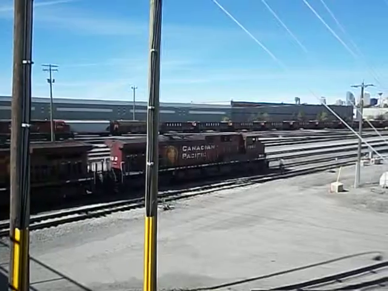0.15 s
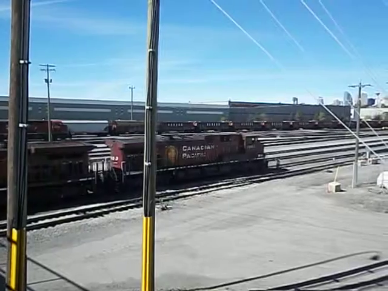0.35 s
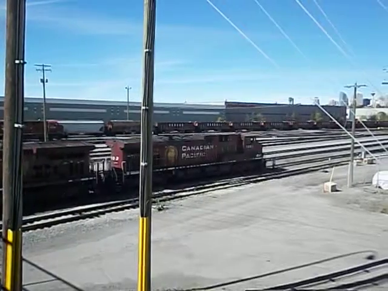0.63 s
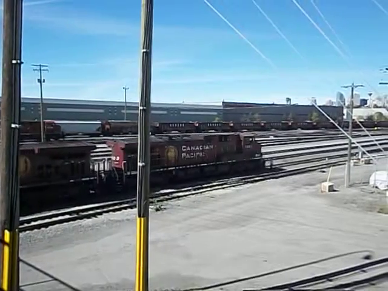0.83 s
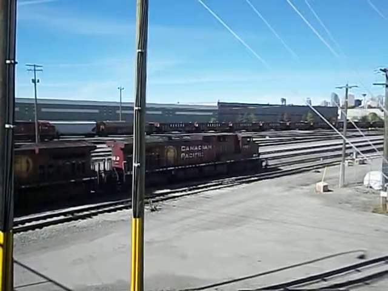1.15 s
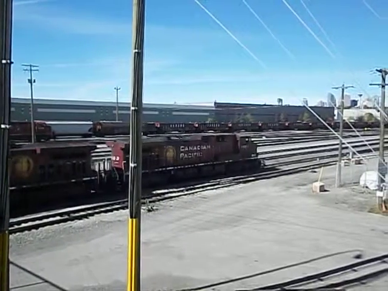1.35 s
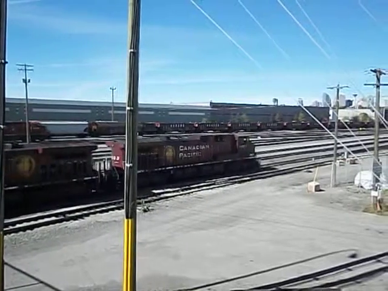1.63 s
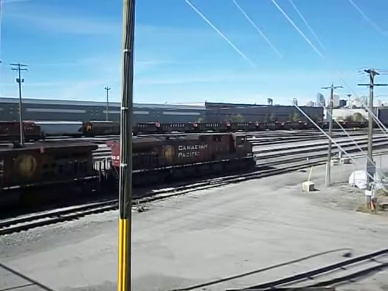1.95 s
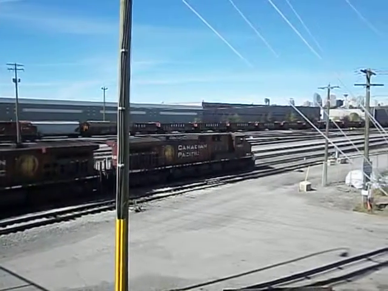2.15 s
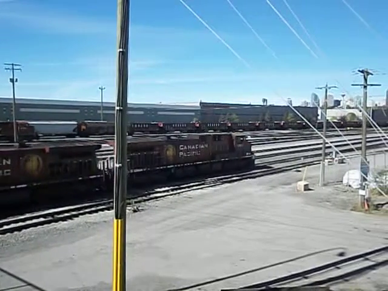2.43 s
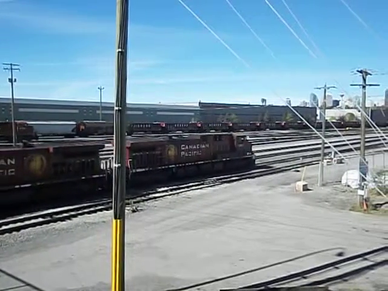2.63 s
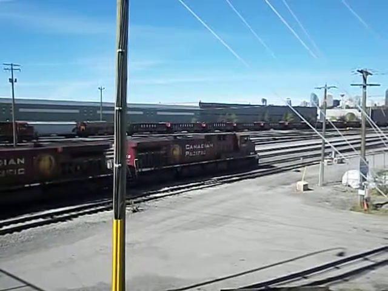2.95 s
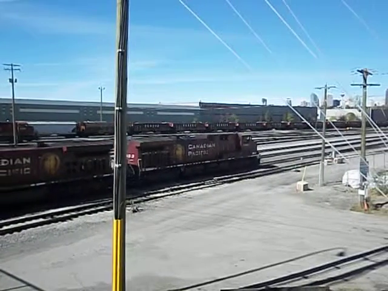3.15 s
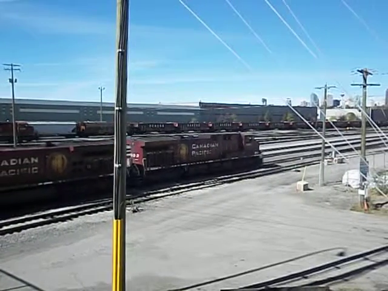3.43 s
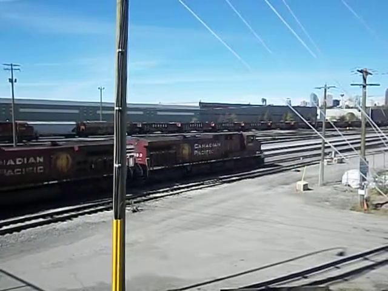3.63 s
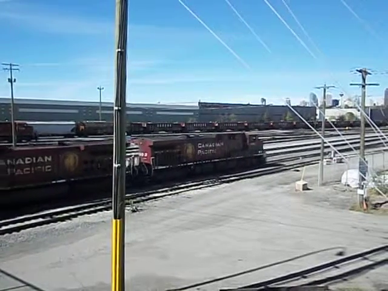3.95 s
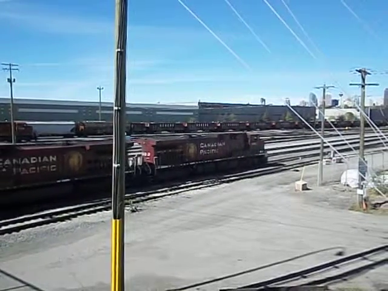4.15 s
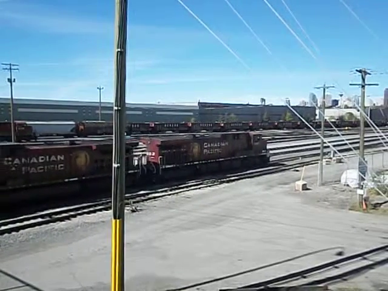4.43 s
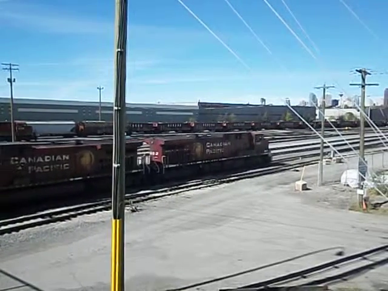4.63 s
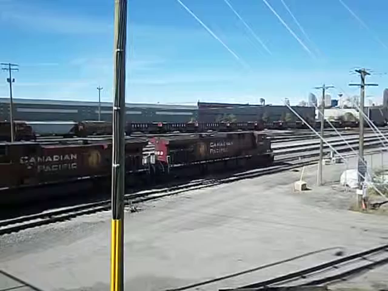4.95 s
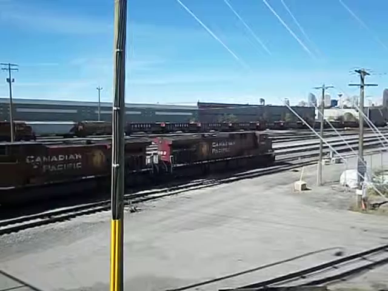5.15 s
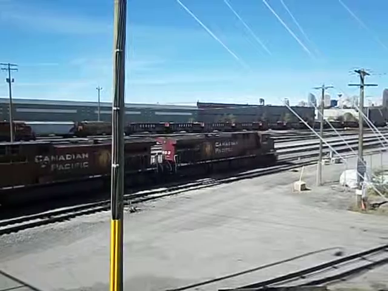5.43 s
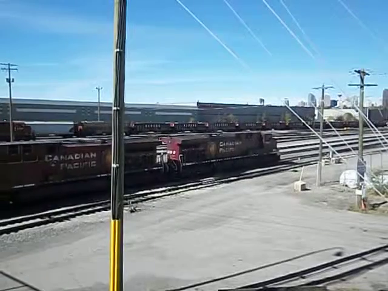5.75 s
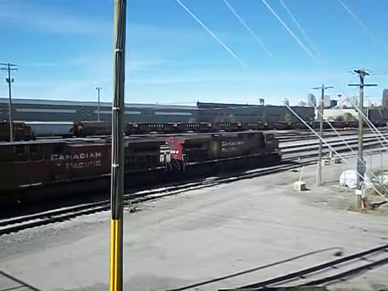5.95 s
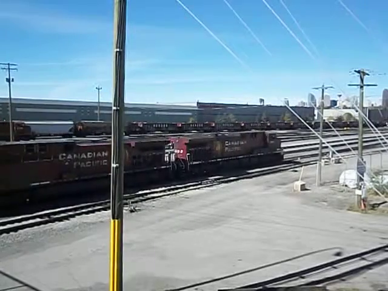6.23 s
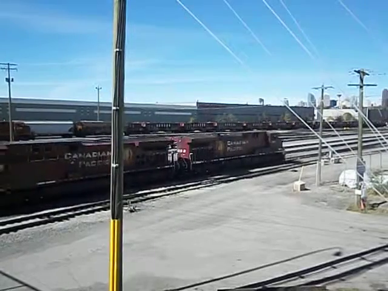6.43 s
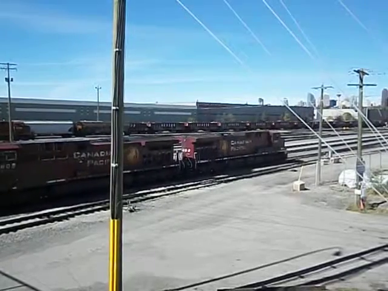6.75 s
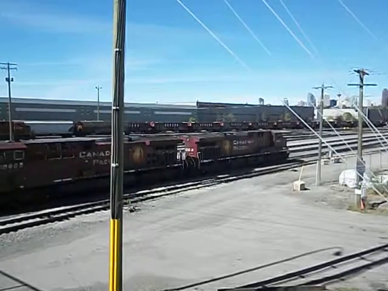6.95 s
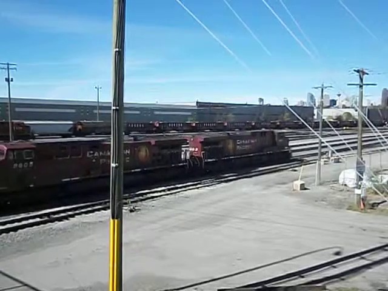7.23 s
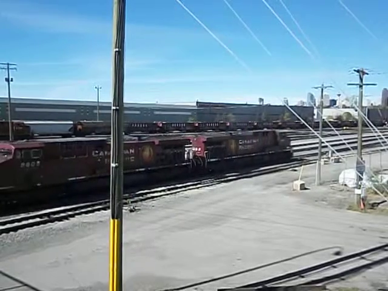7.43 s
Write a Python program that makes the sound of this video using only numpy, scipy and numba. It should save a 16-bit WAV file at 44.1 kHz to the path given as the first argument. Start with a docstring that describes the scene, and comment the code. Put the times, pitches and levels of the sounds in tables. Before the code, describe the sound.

From 0 s, two diesel locomotives run in an open rail yard with a thick, low, uneven throb around 60 Hz, exhaust rumble and broad fan roar. Fuzzy hums of rotating parts and a faint, unsteady blower whine near 530 Hz sit inside it. Irregular bass thumps, several each second, make the whole sound drop abruptly and creep back, as if a small recorder were overloading; peaks are softly clipped and the top treble is missing. At about 3.2 s an air valve spits; from 3.5 s it opens into a strong jet hiss with a breathy, hollow pipe tone, loudest around 3.6-3.8 s, fading out by 4.3 s. The drone carries on, the firing tone swelling near 5 s. Tiny air puffs come at 6.1 and 6.9 s. From about 6 s one engine speeds up, its pitch rising slightly, with heavy chugs about four per second until the end at about 7.6 s.

```python
"""Two diesel locomotives idle in a rail yard with a deep, uneven beat, and one speeds up near the end.
Sines at multiples of the engine cycle make the beat; shaped noise makes rumble, fan roar and hums.
From about 3.2 s an air valve spits and blows off in jet hiss, with a breathy pipe note in the blow-off.
The whole sound keeps dropping suddenly under tall bass thumps and creeping back;
a small recorder ducks the tallest peaks in steps, clips them softly and cuts the top treble."""
import sys
import numpy as np
from scipy import signal
from scipy.fft import rfft, irfft, next_fast_len
from scipy.io import wavfile
from scipy.ndimage import uniform_filter1d, map_coordinates
from numba import njit

SR = 44100
rng = np.random.default_rng(int(sys.argv[2]) if len(sys.argv) > 2 else 0)


def file_out(sig):
    """Save sig as 16-bit WAV at sys.argv[1]."""
    # one column per channel
    cols = np.atleast_2d(sig).T
    # limit, then scale
    lim = np.clip(cols, -1, 1)
    pcm = np.round(lim * 32767).astype(np.int16)
    wavfile.write(sys.argv[1], SR, pcm)


N = 335160
TIME = np.arange(N) / SR  # seconds

# Levels of single sources are those before the shared level curves, wavers and drops.
# Idling engine speed. Each row: time in seconds, four-stroke cycles per second.
ENGINE_CYCLE = [(0, 3.65), (2.5, 3.645), (4, 3.63), (5.5, 3.68), (7.6, 3.7)]
# Unequal cylinders sound multiples of the cycle. Each row: multiple, level in dB rms.
CYLINDER_ORDERS = [(6, -35.5), (7, -33.5), (8, -34.5), (9, -27), (11, -25.5), (12, -30), (13, -24.5),
                   (14, -25), (15, -29), (17, -25.5), (18, -27), (19, -30), (20, -21), (21, -36.5),
                   (22, -31), (24, -44), (25, -35), (28, -30), (29, -30), (36, -30.5)]
# Slow balance of the idle. Each row: time in seconds, orders gain in dB, rumble gain in dB.
IDLE_BALANCE = [(0, -0.5, 0), (1, -0.5, 0), (2, -2.5, 2.5), (3, 2.5, -3.5), (3.5, 2.5, -7), (4, -4.5, 1.5),
                (4.6, -3, 2), (5.5, -2.5, -4.5), (6.5, 0, 0), (7.6, -1, -4)]
# Firing tone, weak while the two engines cancel. Each row: time in seconds, level in dB rms.
FIRING_LEVEL = [(0, -26.5), (.5, -22), (2, -17), (2.4, -27), (4.4, -24.5), (4.9, -14.5), (5.8, -14.5),
                (6.4, -16), (7, -12), (7.6, -13)]
# Firing pitch as one engine speeds up. Each row: time in seconds, pitch in Hz.
FIRING_PITCH = [(0, 58.5), (2, 58.4), (4.4, 58.2), (5.8, 58.9), (6.4, 60.5), (7, 62.5), (7.6, 65)]
# Pulses of one strong cylinder. Each row: centre in seconds, level in dB rms at the centre.
CYLINDER_CHUGS = [(6.269, -23), (6.53, -21), (6.788, -13.5), (7.05, -17), (7.326, -9), (7.58, -11)]
# Second harmonic of the idling engine's firing. Each row: time in seconds, level in dB rms.
OCTAVE_LEVEL = [(0, -30), (1.2, -21.5), (3.5, -25), (4.3, -19.5), (4.9, -22), (5.3, -43.5), (7.6, -42)]
OCTAVE_ORDER = 32  # multiple of the cycle
# Exhaust rumble colour. Each row: frequency in Hz, relative level in dB per Hz.
RUMBLE_COLOUR = [(8.8, -43), (15, -1), (43, 1), (65, -0.5), (220, -16.5), (290, -49), (480, -120)]

# Fan and engine-body colour. Each row: frequency in Hz, relative level in dB per Hz.
ROAR_COLOUR = [(88, -31), (150, 3.5), (205, -6), (254, -3), (309, -7), (341, -4), (514, -2.5), (567, -8),
               (1040, -10.5), (1170, -16), (1620, -20), (1980, -14.5), (2450, -28), (6140, -36),
               (7600, -39.5), (9880, -54.5), (16700, -120)]
# Hood and louvre resonances. Each row: centre in Hz, width in Hz, strength in dB.
HOOD_RESONANCES = [(258, 60, 4), (994, 156, 3), (1978, 77, 5)]
# Changing roar colour. Each row: time in seconds, then gains in dB of low, mids, hood ring and treble.
ROAR_BALANCE = [(0, 0, 1.5, 1.5, 1.5), (1.5, -1, 1.5, 2, 1.5), (3, 0, 4, 1.5, 3.5), (4.5, 0, 4.5, 1, 4),
                (5.5, -2.5, -0.5, -6.5, 0), (6.5, 0.5, 1.5, -4, 2.5), (7.6, -3.5, -1, -9.5, 1)]
# Fuzzy tones of rotating parts.
# Each row: centre in Hz, width in Hz, level in dB, loudest time in seconds, bell half-length in seconds.
ROTATING_HUMS = [(341, 19, -36, 3.8, 3.3), (494, 3.8, -33.5, 2.6, 3.9), (1095, 19, -28, .6, 0.41),
                 (1069, 10, -37, 2.3, 3), (1350, 320, -35, 8.2, 2.9), (4180, 15, -51, 2.4, .4)]
# Blower whine. Each row: time in seconds, pitch in Hz, level in dB rms.
BLOWER_WHINE = [(0, 518, -37.5), (2.2, 531.5, -36.5), (4.2, 525.5, -35.5), (6, 535.2, -34.5),
                (7.6, 527.8, -30.5)]
# Brief swells of the machinery. Each row: centre in seconds, boost in dB.
MACHINERY_SURGES = [(0.715, 3.5), (1.405, 3), (2.70, 4), (4.805, 3), (5.235, 5.5), (5.51, 2), (5.79, 3),
                    (6.105, 3), (6.72, 3)]
SURGE_S = 0.02  # bell half-length, seconds
# Shared level of engines and machinery. Each row: time in seconds, gain in dB.
ENGINE_LEVEL = [(0, -0.5), (1, 3), (2, 1), (3, 2.5), (3.5, 3), (3.7, -1.5), (3.9, 0.5), (4.4, 0), (5.5, 2),
                (6.5, 3.5), (7.6, 2)]

# Sudden drops, each under a tall bass thump. Each row: time in seconds, depth in dB.
# A negative depth drops by its size, but makes the thump smaller.
SUDDEN_DROPS = [(0.048, 2), (0.194, 4.5), (0.505, 3.5), (0.73, 2.5), (1.052, 5), (1.43, 4.5), (1.51, 4.5),
                (1.681, 3.5), (1.866, 1), (1.875, 4.5), (1.973, 1.5), (2.138, 3.5), (2.19, 5), (2.422, 4),
                (2.465, 3.5), (2.52, 4), (2.773, 2.5), (2.795, 7.5), (3.058, 4), (3.288, 1.5), (3.326, 6),
                (3.522, 0.5), (3.601, 3.5), (3.695, 0), (3.827, 2.5), (3.895, 3.5), (4.002, 3.5),
                (4.071, 2.5), (4.15, 2.5), (4.238, 3), (4.426, 3.5), (4.623, 2), (4.701, 3), (4.886, 3.5),
                (4.971, 4), (5.248, -2.5), (5.313, 3.5), (5.534, 3), (5.816, 5.5), (5.985, 5), (6.172, 4.5),
                (6.291, 4.5), (6.416, 7.5), (6.533, 4), (6.62, 2.5), (6.801, 6), (7.027, 6), (7.078, 3.5),
                (7.284, 3), (7.351, 7.5), (7.469, 4)]
DROP_S = .0004  # length of the ticking step, seconds
RECOVER_DB_PER_S, FLUTTER_DB = 40, 0.7  # pace of the return; size of the small random unrest
THUMP_DB, THUMP_GROWS = -10.5, 0.29  # peak in dB at zero depth; dB more per dB of drop
THUMP_HZ, THUMP_S = 63.4, .008  # pitch in Hz; bell half-length in seconds

# Short valve spits. Each row: start in seconds, level in dB rms before the soft attack, t60 in seconds.
VALVE_SPITS = [(3.243, -27, 0.7), (3.283, -34, .15), (3.312, -30, 0.12), (6.097, -28.5, 0.08),
               (6.903, -36, 0.14)]
# Spitting nozzle resonances. Each row: centre in Hz, width in Hz, strength in dB.
NOZZLE_RESONANCES = [(3700, 990, -6.5), (5100, 900, -4.5), (6000, 120, 3.5), (6600, 1400, -2)]
# Blow-off: leaks, opens, full flow, pressure sags, shuts. Each row: time in seconds, hiss in dB rms.
BLOW_OFF_FLOW = [(3.38, -52), (3.48, -35), (3.56, -29), (3.582, -18.5), (3.66, -15.5), (3.8, -17.5),
                 (3.86, -22.5), (4.15, -31), (4.2, -39), (4.32, -47)]
# Jet hiss colour. Each row: frequency in Hz, relative level in dB per Hz.
JET_COLOUR = [(760, -32), (1300, -4), (1520, -24.5), (1630, -5.5), (2210, -8.5), (2800, -8.5), (3470, -14),
              (4030, -12.5), (4370, -14), (4670, -13), (6270, -11), (7600, -16), (9880, -34.5),
              (16700, -120)]
# Valve whistles. Each row: centre in Hz, width in Hz, strength in dB.
VALVE_WHISTLES = [(2760, 62, 2), (4920, 110, 0), (5220, 430, 1), (5700, 60, -4), (6040, 120, 3.5),
                  (6300, 60, -4)]
# Vent pipe resonances. Each row: centre in Hz, width in Hz, strength in dB.
PIPE_RESONANCES = [(600, 87, -7), (836, 71, -5.5), (1018, 170, -2), (1330, 200, -8.5), (1494, 68, -5),
                   (2233, 220, -8.5)]
PIPE_DB, PIPE_FOLLOWS = -11.5, .7  # pipe note at full flow in dB rms, before flutter; its dB per dB of hiss

TOP_HZ = 9150  # the recorder passes nothing from here up


def amp(db):
    """Gain of a level in dB."""
    return 10 ** (np.asarray(db) / 20)


def unit(x):
    """x at rms 1."""
    return x / np.sqrt(np.mean(x ** 2) + 1e-20)


def along(points, hz):
    """Read (Hz, value) points on a log frequency axis."""
    f, v = np.transpose(points)
    return np.interp(np.log(hz + 1), np.log(f + 1), v)


def curves(rows):
    """One value per sample for each column after the time."""
    s, *cols = np.transpose(rows)
    return [np.interp(TIME, s, c) for c in cols]


def bell(centre, half_length):
    """A smooth swell to 1 and back, down to 1/e a half-length from its centre (seconds)."""
    return np.exp(-((TIME - centre) / half_length) ** 2)


def wobble(rate):
    """A smooth random curve, rate knots a second."""
    knots = rng.standard_normal(int(N * rate / SR) + 4)
    return map_coordinates(knots, [np.arange(N) * rate / SR])


def filtered(x, response):
    """x times a response of frequency."""
    m = next_fast_len(N + 8192)
    return irfft(rfft(x, m) * response(np.fft.rfftfreq(m, 1 / SR)), m)[:N]


def peaks(modes, hz):
    """Gain of (Hz, width, dB) resonances added in power."""
    return np.sqrt(sum(amp(db) ** 2 / (1 + (2 * (hz - c) / w) ** 2) for c, w, db in modes))


def noise(response, patchy_db):
    """Coloured noise of rms 1 with patches of random gain over time and frequency."""
    z = signal.stft(rng.standard_normal(N + 512), nperseg=512)[2]
    field = uniform_filter1d(rng.standard_normal(z.shape), 6, 0)
    field = uniform_filter1d(field, 8, 1)
    patchy = signal.istft(z * amp(patchy_db * unit(field)), nperseg=512)[1][:N]
    return unit(filtered(patchy, response))


def wandering_phase(hz, waver):
    """Phase in radians from a random start, wandering on a random curve scaled by waver."""
    return 2 * np.pi * (np.cumsum(hz) / SR + rng.random()) + waver * wobble(6)


def tone(hz, db, waver):
    """A sine of given rms level whose phase wanders."""
    return np.sqrt(2) * amp(db) * np.sin(wandering_phase(hz, waver))


def firing_tone():
    """Evenly spaced firings sound one tone; a strong cylinder adds pulses locked to its phase."""
    (hz,), (db,) = curves(FIRING_PITCH), curves(FIRING_LEVEL)
    phase = wandering_phase(hz, .25)
    # the strong cylinder rings the exhaust 9 Hz above the firing tone
    chugs = sum(amp(level) * bell(s, 0.04) * np.sin(phase + 2 * np.pi * 9 * (TIME - s))
                for s, level in CYLINDER_CHUGS)
    return np.sqrt(2) * (amp(db) * np.sin(phase) + chugs)


def engines():
    """Unequal cylinders sound multiples of the cycle, with firing tones and rumble between them."""
    cycle, = curves(ENGINE_CYCLE)
    orders_db, rumble_db = curves(IDLE_BALANCE)
    orders = sum(tone(k * cycle, db + orders_db + 1.5 * wobble(.8), waver=0.23)
                 for k, db in CYLINDER_ORDERS)
    octave = tone(OCTAVE_ORDER * cycle, *curves(OCTAVE_LEVEL), waver=0.25)
    rumble = noise(lambda hz: amp(along(RUMBLE_COLOUR, hz)), patchy_db=0.5)
    return orders + firing_tone() + octave + amp(rumble_db - 17.5) * rumble


def fan_roar():
    """Fans and engine body roar through hood resonances; four bands shift in balance."""
    low_db, mids_db, ring_db, treble_db = curves(ROAR_BALANCE)
    roar = noise(lambda hz: amp(along(ROAR_COLOUR, hz)) * np.sqrt(1 + peaks(HOOD_RESONANCES, hz) ** 2),
                 patchy_db=0.95)
    # lowpasses nested so that their differences are the bands
    to_low, to_mids, to_ring = (filtered(roar, lambda hz: 1 / (1 + (hz / edge) ** 8))
                                for edge in (650, 1650, 2400))
    # the treble level wavers quickly and slightly at random
    unrest = amp(0.57 * wobble(25) + 1.2 * wobble(120))
    low = amp(low_db) * to_low
    mids = amp(mids_db) * (to_mids - to_low)
    ring = amp(ring_db) * (to_ring - to_mids)
    treble = amp(treble_db) * unrest * (roar - to_ring)
    return amp(-20) * (low + mids + ring + treble)


def rotating_hum(hz, width, db, loudest, lasting):
    """A rotating part hums as a narrow noise band that swells and wavers."""
    hum = noise(lambda f: peaks([(hz, width, 0)], f) ** 2, patchy_db=0.5)
    return amp(db + 2.2 * wobble(3.3)) * bell(loudest, lasting) * hum


def machinery():
    """Fan roar, the hums of rotating parts and a blower whine of unsteady level and phase."""
    hums = sum(rotating_hum(*row) for row in ROTATING_HUMS)
    unsteady = amp(1.8 * wobble(4.9) + 1.9 * wobble(2.5))
    return fan_roar() + hums + unsteady * tone(*curves(BLOWER_WHINE), waver=0.83)


def thumps():
    """A tall exhaust beat, pushing or pulling at random, is a short bass pulse centred on each drop."""
    signs = np.sign(rng.standard_normal(len(SUDDEN_DROPS)))
    return sum(sign * amp(THUMP_DB + THUMP_GROWS * db) * bell(s, THUMP_S)
               * np.cos(2 * np.pi * THUMP_HZ * (TIME - s))
               for (s, db), sign in zip(SUDDEN_DROPS, signs))


def drops():
    """Gain of the sudden drops: they pile up, and the level climbs back at a steady pace in dB."""
    knots, dip_db, last = [(0, 0)], 0, 0
    for s, db in SUDDEN_DROPS + [(N / SR, 0)]:
        back = last + dip_db / RECOVER_DB_PER_S  # when the level would be whole again
        if back < s:
            knots.append((back, 0))
        dip_db = max(dip_db - RECOVER_DB_PER_S * (s - last), 0)
        knots.append((s, dip_db))
        dip_db, last = dip_db + abs(db), s + DROP_S
        knots.append((last, dip_db))
    return amp(FLUTTER_DB * wobble(20) - curves(knots)[0])


def spits():
    """Brief puffs of air hiss through the nozzle resonances, with a soft attack and fading tail."""
    puffs = sum(amp(db - 60 * np.abs(TIME - s) / t60) * np.clip((TIME - s) / 0.018, 0, 1)
                for s, db, t60 in VALVE_SPITS)
    return puffs * noise(lambda hz: peaks(NOZZLE_RESONANCES, hz) * amp(along(JET_COLOUR, hz)),
                         patchy_db=2.0)


def blow_off():
    """Escaping air makes jet hiss with whistles; a breathy pipe note follows its level less steeply."""
    hiss_db, = curves(BLOW_OFF_FLOW)
    opened = (TIME > BLOW_OFF_FLOW[0][0]) & (TIME < BLOW_OFF_FLOW[-1][0])
    jet = noise(lambda hz: amp(along(JET_COLOUR, hz)) * np.sqrt(1 + peaks(VALVE_WHISTLES, hz) ** 2),
                patchy_db=-0.5)
    pipe = noise(lambda hz: peaks(PIPE_RESONANCES, hz) ** 2, patchy_db=1.5)
    pipe = pipe * amp(1.8 * wobble(60))  # breathy flutter
    pipe_db = PIPE_DB + PIPE_FOLLOWS * (hiss_db - hiss_db.max())
    return opened * (amp(hiss_db) * jet + amp(pipe_db) * pipe)


def scene():
    """Engines and machinery, thumps and the air valve all share the sudden drops."""
    level_db, = curves(ENGINE_LEVEL)
    surge_db = sum(db * bell(s, SURGE_S) for s, db in MACHINERY_SURGES)
    locomotives = amp(level_db) * (engines() + amp(surge_db) * machinery())
    air_valve = spits() + blow_off()
    return (drops() * (locomotives + thumps() + air_valve))[None]


@njit
def ducking(x, top, step, rise, hold):
    """Gain drops by a sudden step when the output passes top, then creeps back."""
    gain, wait, out = 1.0, 0, np.empty_like(x)
    for i in range(len(x)):
        wait -= 1
        if abs(x[i] * gain) > top and wait <= 0:
            gain *= step
            wait = hold  # samples before it may step again
        gain = min(1.0, gain * rise)
        out[i] = x[i] * gain
    return out


def record(dry):
    """The recorder's stepped gain control, soft clipping and band limit."""
    # steps of 1.8 dB at least 5 ms apart, creeping back at 80 dB per second
    x = ducking(dry[0], .72, amp(-1.8), amp(80 / SR), SR // 200)
    x = x / (1 + np.abs(x) ** 12) ** (1 / 12)
    return filtered(x, lambda hz: (hz < TOP_HZ) / np.sqrt(1 + (hz / 7600) ** 24 + (hz / 8500) ** 90))[None]


dry = scene()
out = record(dry)
file_out(out)
```